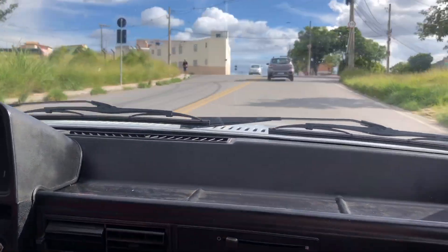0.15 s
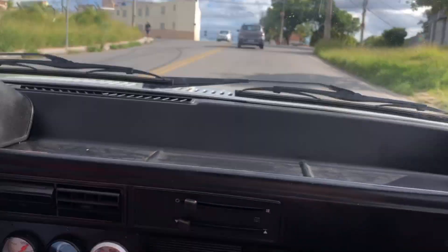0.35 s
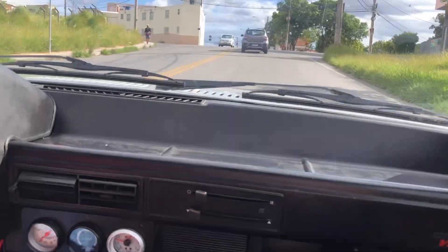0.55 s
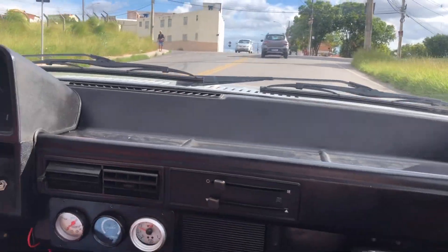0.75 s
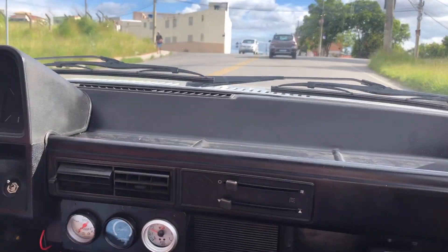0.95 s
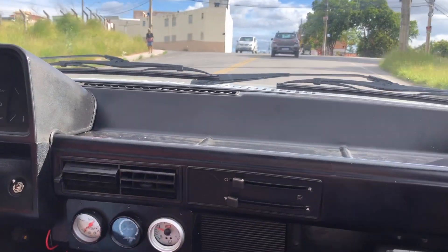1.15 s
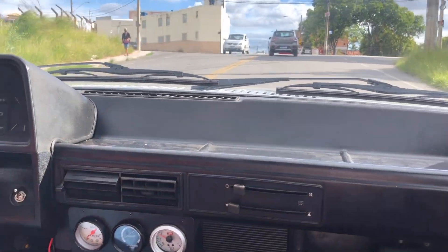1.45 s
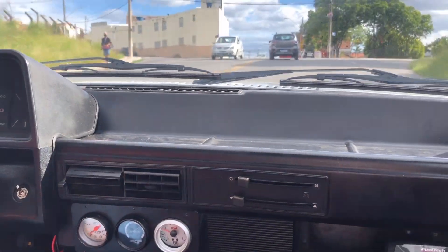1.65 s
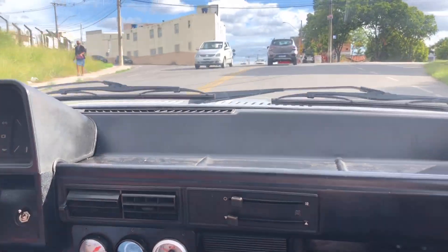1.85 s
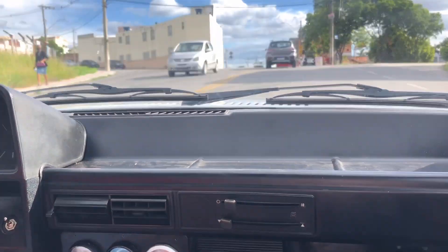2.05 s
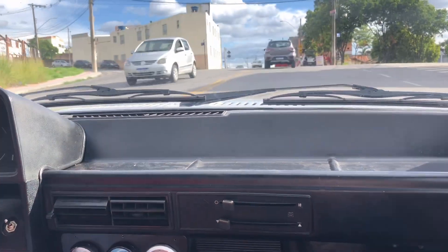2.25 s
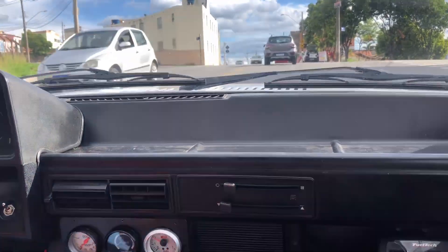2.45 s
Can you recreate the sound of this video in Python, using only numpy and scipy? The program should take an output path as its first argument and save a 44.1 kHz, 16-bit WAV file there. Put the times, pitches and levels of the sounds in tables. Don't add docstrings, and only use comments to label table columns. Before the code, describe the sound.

Turbo car engine from inside the cabin, note sagging with a falling valve hiss, then pulling again

```python
import sys
import numpy as np
from scipy import signal
from scipy.io import wavfile

SR = 44100
rng = np.random.default_rng(int(sys.argv[2]) if len(sys.argv) > 2 else 0)


def linear_from_db(decibels):
    return 10 ** (np.asarray(decibels, float) / 20)


def output_pcm(signal):
    pcm = np.clip(np.atleast_2d(signal).T, -1, 1) * 32767
    wavfile.write(sys.argv[1], SR, np.round(pcm).astype(np.int16))


N = 114660
LOAD_ON_S, LOAD_OFF_S = 0.568, 2.447


def rms_one(x):
    return x / np.sqrt(np.mean(x ** 2) + 1e-20)


def in_time(rows):
    s, *columns = np.transpose(rows)
    return [np.interp(np.arange(N) / SR, s, column) for column in columns]


def drift(rate):
    r = np.exp(-80 * np.pi * rate / SR)
    points = rng.standard_normal(N // 40 + 2002)
    slow = signal.lfilter([1], [1, -2 * r, r * r], points)[2000:]
    return np.interp(np.arange(N) / 40, np.arange(len(slow)), rms_one(slow))


def resonate(x, hz, width_hz):
    r = np.exp(-np.pi * width_hz / SR)
    feedback = [1, -2 * r * np.cos(2 * np.pi * hz / SR), r * r]
    return signal.lfilter(np.array([1, 0, -1]) * (1 - r * r) / 2, feedback, x)


def bands(spectrum, patchy_db):
    white = rng.standard_normal((2, N))
    edges = 22 * 2 ** np.arange(0, 9.6, 0.5)
    hz, db = np.transpose(spectrum)
    for k, (low, high) in enumerate(zip(edges, edges[1:])):
        mid = np.sqrt(low * high)
        band = signal.butter(2, [low, high], "band", fs=SR, output="sos")
        noise = signal.sosfilt(band, white[k % 2])
        level_db = np.interp(np.log(mid), np.log(hz), db) + patchy_db * drift(12)
        yield mid, noise * linear_from_db(level_db)


def gliding(hz, width_hz):
    low_pass = signal.butter(2, width_hz / 2, fs=SR, output="sos")
    slow = signal.sosfilt(low_pass, rng.standard_normal((2, N)))
    turn = 2 * np.pi * np.cumsum(hz) / SR
    return rms_one(slow[0] * np.cos(turn) + slow[1] * np.sin(turn))


def firing(hz, level_db, load):
    # [multiple of the note, level under load/dB, level coasting/dB, wander/dB]
    order_levels = [(.5, -54, -43, 3.5), (.75, -53, -48, 5), (1.25, -37, -50, -4), (1.5, -32, -40, 1.5),
                    (1.75, -51, -56, 4), (2, -28.5, -35, 0.12), (2.5, -54.5, -49.5, 3),
                    (3, -39.5, -48.5, 1.5), (4, -70.5, -67, 10), (4.25, -55, -86, 2.5),
                    (4.75, -52, -59.5, 2.5), (5, -63.5, -83, 6.5)]
    load_lag_rad, skew_rad, phase_wander_rad = 2.35, 1.3, 0.1
    t = np.arange(N) / SR
    turn = 2 * np.pi * np.cumsum(hz) / SR + phase_wander_rad * drift(3.4)

    stumble_db = -5 * np.exp(-0.5 * ((t - 0.6) / 0.008) ** 2)
    strength = linear_from_db(level_db + stumble_db + 0.9 * drift(3.5) + 0.4 * drift(38))
    out = strength * (load * np.cos(turn - load_lag_rad) + (1 - load) * np.cos(turn))

    lift_s = np.where(t > LOAD_OFF_S, LOAD_OFF_S, -0.015)
    thinning_db = 29 * np.maximum(t - lift_s - 0.2, 0)
    bite_db = -7 * np.exp(-np.maximum(t - LOAD_ON_S, 0) / 0.26)
    for k, load_db, coast_db, wander_db in order_levels:
        phase = k * turn + skew_rad * (k - 1) + phase_wander_rad * wander_db * drift(3.1)
        pulling = linear_from_db(load_db + bite_db) * np.cos(phase - k * load_lag_rad)
        coasting = linear_from_db(coast_db - thinning_db + 0.95 * drift(13)) * np.cos(phase)
        out = out + (load * pulling + (1 - load) * coasting) * linear_from_db(wander_db * drift(7.2))
    return np.sqrt(2) * out


def cabin(hz, load):
    # [f/Hz, level per Hz/dB]
    cabin_spectrum = [(22, 2), (40, 16.5), (140, 15), (300, 9), (500, -8), (1000, -4.5), (1700, -12),
                      (7500, -18.5), (15500, -27)]
    # [f/Hz, width/Hz, level/dB]
    panels = [(476.6, 20, -56.5), (697.4, 120, -57.5), (812, 100, -57.5), (964.5, 64, -57.5),
              (1065, 90, -60), (1467, 33, -63), (1654, 60, -67), (2466, 30, -66), (2854, 130, -63),
              (3213, 270, -66.5), (4235, 49, -67), (4900, 160, -66.5)]
    t = np.arange(N) / SR

    coast_db = -6.5 + 12 * np.log2(hz / 105)
    boost_db = 2 * (t - 0.5)
    work = linear_from_db((1 - load) * coast_db + load * boost_db)
    work = work * (1 + 0.08 * np.cos(2 * np.pi * np.cumsum(hz) / SR))

    noise = 0
    for mid, band in bands(cabin_spectrum, patchy_db=1.97):
        if 350 < mid < 2400:
            band = band * work
        elif mid > 2400:
            band = band * np.sqrt(work)
        noise = noise + band

    white, rings = rng.standard_normal(N), 0
    for f, width_hz, db in panels:
        ring = rms_one(resonate(resonate(white, f, width_hz), f, width_hz))
        rings = rings + linear_from_db(db + 3.56 * drift(8)) * ring

    buzz_shape = np.exp(-0.5 * ((t - 1.76) / 0.034) ** 2)
    buzz = linear_from_db(-48) * buzz_shape * gliding(np.full(N, 832), width_hz=37.4)
    return linear_from_db(-36) * rms_one(noise) + work * rings + buzz


def blow_off():
    # [t/s, lower jet f/Hz, upper jet f/Hz, jet level/dB, hiss level/dB]
    vents = [
        (-.03, 6252, 12020, -26.5, -29.5),
        (2.397, 4900, 8540, -37, -39),
    ]
    # [f/Hz, width/Hz, level/dB]
    pipe = [(4080, 30, 0), (4600, 23, -6), (5234, 24, 4.5), (5460, 32, 4), (5914, 40, 9), (6240, 124, 1),
            (7790, 150, 5.5), (8710, 130, 4), (9130, 110, 5), (11200, 86, 1.5), (11580, 130, 4)]
    # [f/Hz, level per Hz/dB]
    vent_hiss = [(1200, -10.5), (2500, -12.5), (4000, -13.5), (6000, -10), (7700, -2), (9500, -9),
                 (12000, -10), (15500, -22.5)]
    attack_s, hold_s, puff_s = 0.032, 0.074, 0.016
    jet_width_hz, stall_hz = 1200, 5550
    t, jets, broad = np.arange(N) / SR, 0, 0
    hiss = rms_one(sum(band for _, band in bands(vent_hiss, patchy_db=-1.4)))

    for start, low_hz, high_hz, jet_db, hiss_db in vents:
        age = np.maximum(t - start, 0)
        rise = np.minimum(age / attack_s, 1) ** 2
        late = np.maximum(age - hold_s, 0)

        low_centre = np.maximum(low_hz - 4200 * age, 1500)
        low = linear_from_db(0.79 * drift(35) - 41 * late) * gliding(low_centre, jet_width_hz)
        high_centre = high_hz - 9700 * age
        high = linear_from_db(-8 + 2.0 * drift(17) - 28 * late)
        high = high * gliding(np.maximum(high_centre, 1500), jet_width_hz)
        high = high * np.clip((high_centre - stall_hz) / 250, 0, 1)
        jets = jets + rise * linear_from_db(jet_db) * (low + high)

        broad = broad + rise * linear_from_db(hiss_db - 40.5 * late) * hiss
        puff = age / puff_s * np.exp(1 - age / puff_s)
        broad = broad + linear_from_db(hiss_db - 7) * puff * gliding(np.full(N, 13000), width_hz=5000)

    modes = sum(linear_from_db(db) * resonate(jets + 0.35 * broad, f, width_hz) for f, width_hz, db in pipe)
    return 0.45 * jets + 0.84 * broad + modes


def turbo(load):
    # [t/s, f/Hz, level/dB]
    whine_path = [(.62, 4800, -72), (.8, 4920, -65), (1.3, 5300, -68), (1.7, 5600, -66), (2.0, 5930, -62.5),
                  (2.4, 6420, -60)]
    # [t/s, f/Hz, level/dB]
    rush_path = [(.6, 7000, -69), (1.2, 7346, -61), (1.6, 7670, -56), (1.8, 7680, -60), (2.4, 8217, -60)]
    whine_hz, whine_db = in_time(whine_path)
    rush_hz, rush_db = in_time(rush_path)
    whine = linear_from_db(whine_db + 1.525 * drift(8.3)) * gliding(whine_hz, width_hz=41)
    rush = linear_from_db(rush_db + 0.95 * drift(11)) * gliding(rush_hz, width_hz=720)
    return load * (whine + rush)


def scene():
    # [t/s, firing f/Hz, level/dB]
    engine = [
        [(0.03, 173.2, -10), (0.092, 167.1, -12), (0.266, 155.5, -6), (0.294, 151.7, -6.5),
         (0.398, 144.5, -8.5), (0.48, 138, -11), (0.55, 123.5, -14)],
        [(0.63, 118.1, -16.5), (0.866, 109.7, -17), (1.076, 99.26, -18.5), (1.154, 102.6, -17),
         (2.196, 111.1, -15.5), (2.404, 110.6, -15), (2.41, 111.7, -16)],
        [(2.47, 107.7, -15), (2.58, 100.4, -13.5)],
    ]
    t = np.arange(N) / SR
    hz, level_db = in_time(np.concatenate(engine))
    load = np.clip(np.minimum(t - LOAD_ON_S, LOAD_OFF_S - t) / 0.022 + 0.5, 0, 1)
    mix = firing(hz, level_db, load) + cabin(hz, load) + blow_off() + turbo(load)
    return mix[None]


def band_limit(x):
    return signal.sosfilt(signal.butter(12, 16250, fs=SR, output="sos"), x)


def record(dry):
    t = np.arange(N) / SR
    finished = dry * np.clip(np.minimum(t, t[-1] - t) / 0.002, 0, 1)
    return band_limit(finished)


dry = scene()
out = record(dry)
output_pcm(out)
```